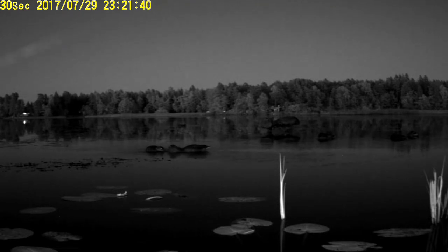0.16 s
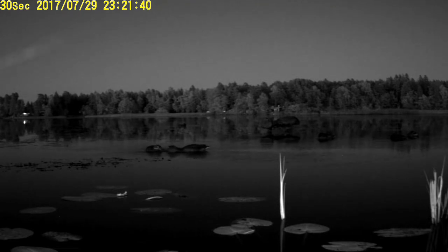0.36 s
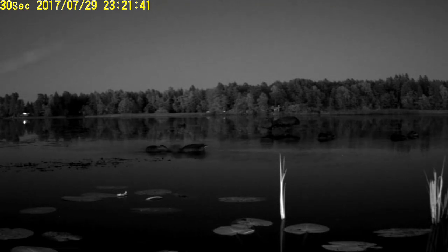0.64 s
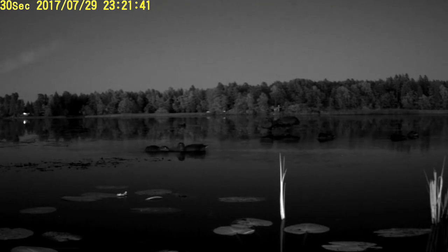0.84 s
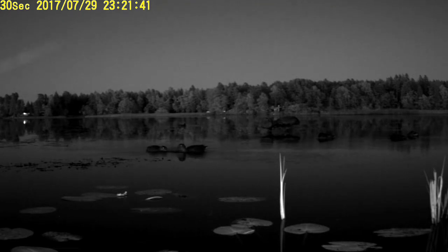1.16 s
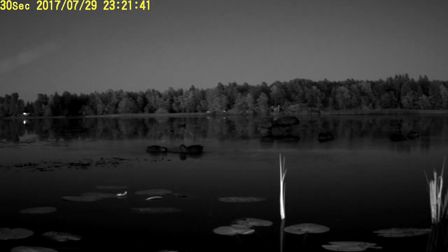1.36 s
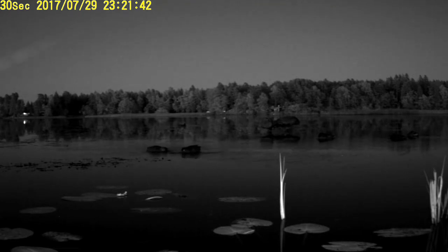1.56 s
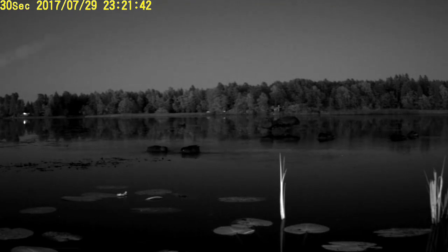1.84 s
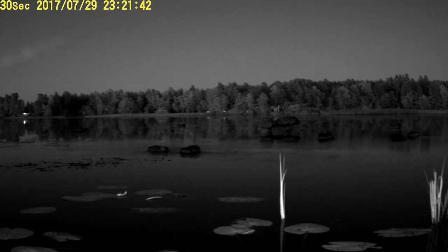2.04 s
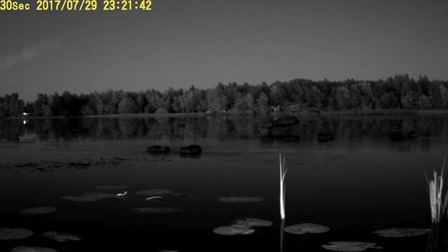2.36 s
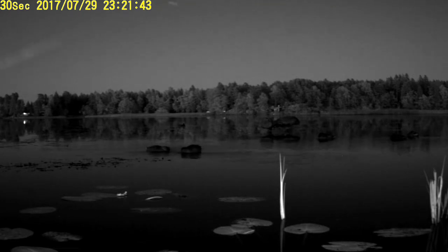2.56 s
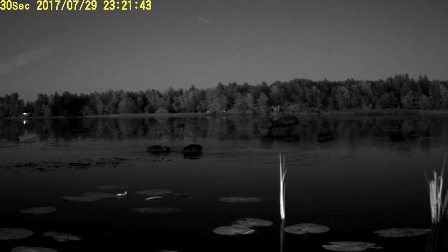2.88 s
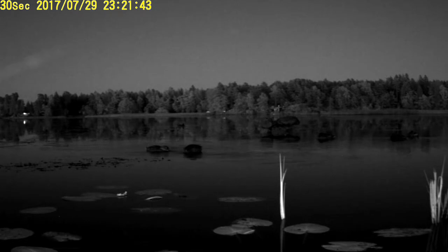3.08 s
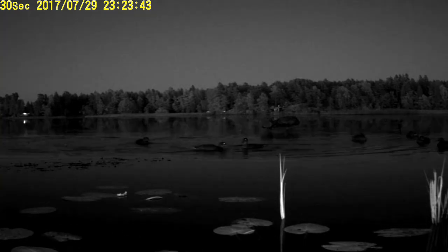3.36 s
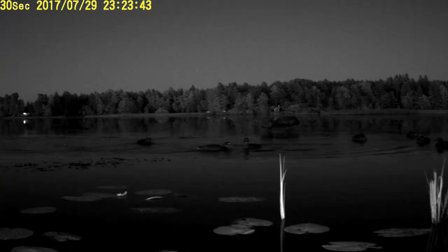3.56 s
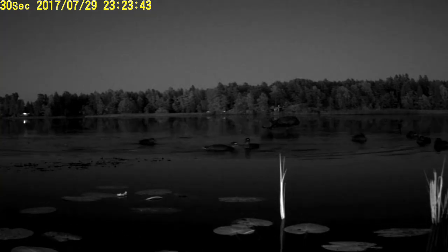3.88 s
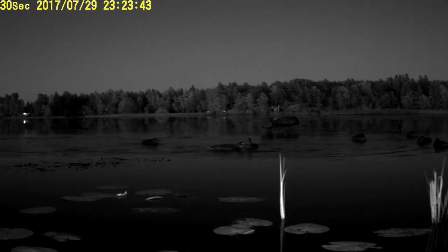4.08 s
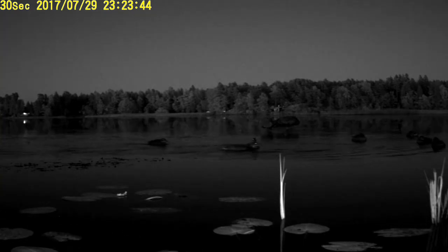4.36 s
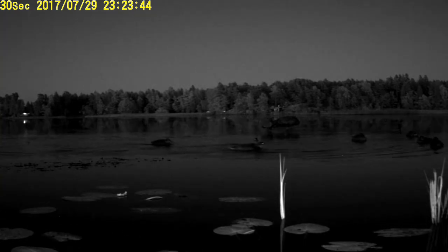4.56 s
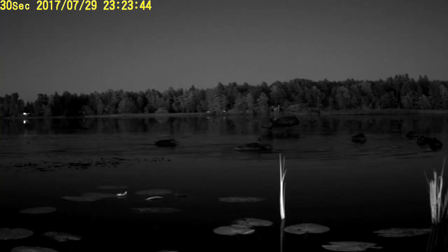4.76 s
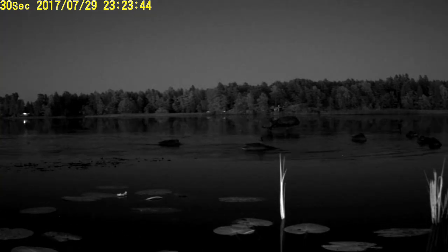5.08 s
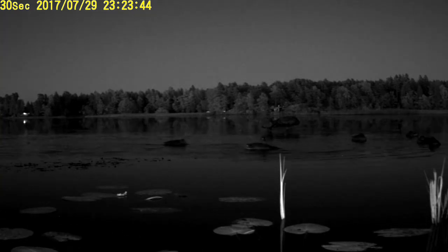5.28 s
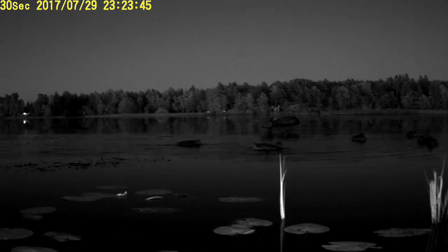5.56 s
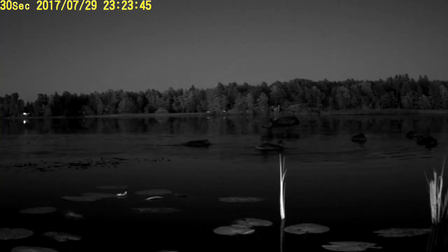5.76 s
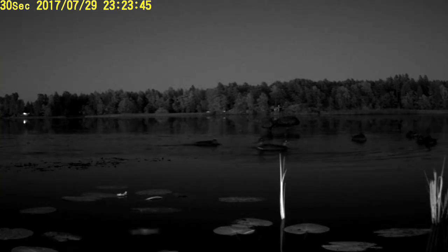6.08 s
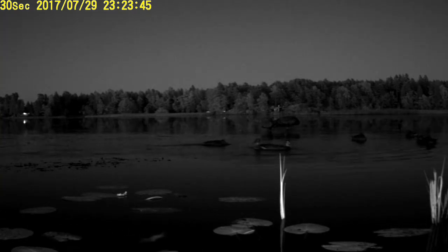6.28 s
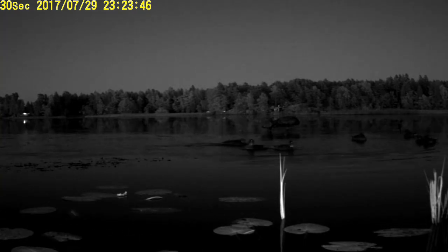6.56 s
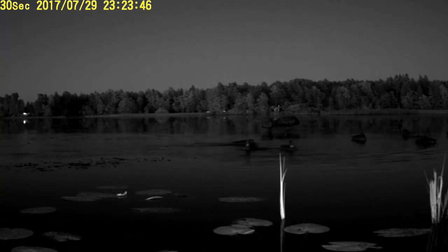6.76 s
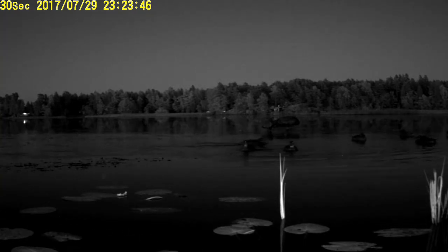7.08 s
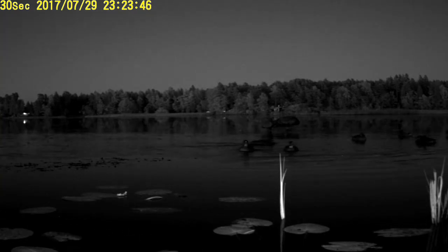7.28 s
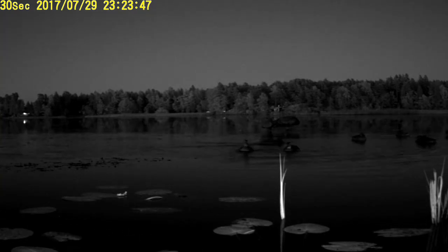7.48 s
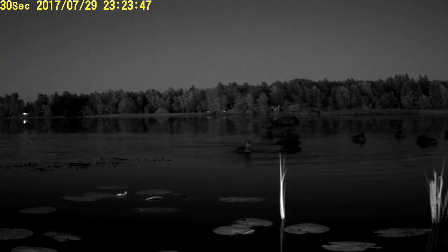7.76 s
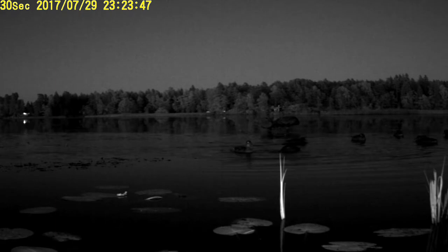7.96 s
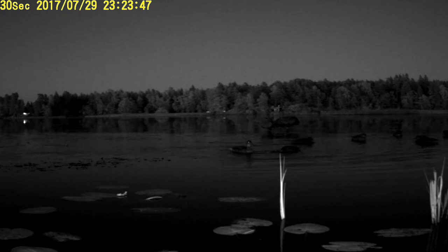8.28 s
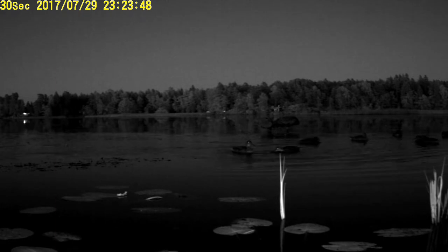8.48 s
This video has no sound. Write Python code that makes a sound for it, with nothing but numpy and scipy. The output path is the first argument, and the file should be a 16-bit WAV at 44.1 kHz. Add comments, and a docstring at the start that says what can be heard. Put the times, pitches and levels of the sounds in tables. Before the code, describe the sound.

Open water, outdoors, almost no echo. First a sparse, hushed stretch of hiss with tiny low peeps and faint short quacks far away. Then a sudden, very loud electrical thud drains off quickly. Afterwards the ducks are livelier: small wooden bill claps, scratchy sieving rasps and short arching whistles about twice a second, a wet slap or two, thinning to isolated ticks and peeps. A plain, noisy fixed microphone on the shore.

```python
"""Far ducks on a lake at night peep in gliding whistles, quack in nasal pulses, clap and rasp their bills.
The microphone is a trail camera's on the shore; water slaps now and then and a faint return rings from the shore.
Under it lie shaped noise hiss, slow drift and two thin sine whines of the electronics.
Midway the amplifier restarts: an offset jumps in and drains away, the volume falls and climbs in small steps.
"""
import sys
import numpy as np
from scipy import signal
from scipy.fft import rfft, irfft
from scipy.io import wavfile
from scipy.ndimage import uniform_filter1d

SR = 44100
rng = np.random.default_rng(int(sys.argv[2]) if len(sys.argv) > 2 else 0)


def materialize(psi):
    """Save the field psi as 16-bit PCM at rate SR to the path in sys.argv[1].

    A 1-D psi becomes a single channel; in a 2-D psi each row is a channel.
    """
    bounded = np.clip(np.atleast_2d(psi).T, -1, 1)
    quanta = np.round(bounded * 32767).astype(np.int16)
    wavfile.write(sys.argv[1], SR, quanta)


N = 380512
T = np.arange(N) / SR

# noise floor of microphone and amplifier, shape only: freq_hz, relative_db
HISS_SPECTRUM = [(15, -36), (25, -5), (116, -3.5), (178, -5.5), (349, -6), (722, -8.5), (804, -9),
                 (1020, -10), (1340, -11.5), (15500, -19.5)]
HISS_DB = -56
# steady whines of the electronics: freq_hz, level_db [rms]
WHINES = [(8857.8, -81), (15734.3, -77)]
# offset at the amplifier input, ahead of the volume: time_s, level_db
OFFSET_CURVE = [(3.378, 7), (3.39, 9.2), (3.402, 8), (3.41, 9.3), (3.43, 8), (3.463, 5.4), (3.502, .4),
                (3.522, .6), (3.547, -3.6), (3.565, -4.2), (3.613, -12), (3.645, -14), (3.681, -22.9),
                (3.762, -36.2), (4.3, -56), (8.7, -90)]
# faint broadband noise after the restart, with its own level curve: time_s, level_db [rms]
FAINT_NOISE_CURVE = [(3.378, -43), (3.435, -71), (3.48, -61), (3.69, -63), (3.75, -100)]
# slaps of water: start_s, length_s, spray_db [rms], note_hz [hollow note, at its start], note_db [rms]
WATER_SLAPS = [(0.371, 0.011, -57, 400, -63), (7.125, 0.026, -41, 401, -47),
               (7.396, 0.024, -73, 770, -54.5)]
# colour of the spray, shape only: freq_hz, relative_db
SPRAY_SPECTRUM = [(71, -32), (120, -9), (396, -8), (3500, -30), (4240, -39), (4670, -31), (9900, -38),
                  (12000, -33), (15600, -54), (22000, -120)]
# bills sieving water: start_s, length_s, loudest_at [share of length 0-1], level_db [rms at loudest], pitch_hz
BILL_RASPS = [ (3.646, 0.048, .3, -51, 1730), (3.7, 0.11, .3, -61, 2000), (3.9, 0.055, .5, -62, 1830),
              (4.1, 0.065, .95, -57, 1930), (4.166, .02, 0.2, -43.5, 1600), (4.18, .055, .4, -55, 2135),
              (4.39, .04, .4, -62, 1980), (4.6, .03, .1, -57, 1810), (4.813, 0.024, .75, -51, 1640),
              (4.837, 0.045, .35, -52, 1668), (5.137, .022, 0.65, -44, 1650),
              (5.619, 0.027, .85, -46, 1404), (5.66, .04, .4, -56, 1466), (5.72, .06, 0.2, -67, 1710),
              (5.88, .03, .3, -61, 1780), (5.957, 0.022, 0.5, -43, 1350), (6.12, 0.028, .6, -61, 1820),
              (6.387, .013, .05, -53, 1520), (6.404, 0.024, .75, -46.5, 1704),
              (6.596, .022, 0.9, -40, 1620), (6.877, 0.024, .85, -49, 1370), (6.992, .028, .95, -50, 1590),
              (7.024, .038, .2, -59, 1730), (7.085, .025, .6, -54, 1850), (7.307, 0.076, .4, -58, 1590),
              (7.387, 0.043, .4, -49, 1528), (7.55, .05, .3, -58, 1920), (8.545, .03, .7, -58, 1780), ]
# single bill claps: time_s, peak_db, pitch_hz [of the blow]
BILL_CLAPS = [(3.754, -37, 1310.0), (3.8042, -35.5, 1010), (3.8072, -43, 890.0), (3.9583, -35.5, 1120.0),
              (3.9835, -34.5, 1380.0), (4.1633, -34, 1150), (4.17, -31.5, 1390.0), (4.176, -41.8, 1310.0),
              (4.579, -33.5, 1560), (4.599, -36.5, 920.0), (4.816, -36.5, 1290.0), (4.8268, -40, 1660.0),
              (4.8664, -37, 1290.0), (4.8787, -41, 1420.0), (5.1181, -35.5, 1150.0), (5.1213, -40, 1090.0),
              (5.154, -30, 1260), (5.1594, -34, 1270), (5.3536, -37, 810.0), (5.5345, -35.5, 1480),
              (5.602, -36, 860.0), (5.642, -40, 1320), (5.6452, -27.5, 1340), (5.652, -34, 1190.0),
              (5.931, -36, 990.0), (5.9346, -39, 1430.0), (5.975, -32, 1310), (6.3857, -34.5, 1010.0),
              (6.4205, -35, 1360), (6.423, -29, 1010), (6.4276, -26, 1370), (6.582, -36, 880.0),
              (6.587, -38, 960), (6.5905, -35, 840), (6.599, -40, 1250), (6.608, -31, 840),
              (6.612, -26.5, 1440), (6.614, -26.5, 1140), (6.619, -23, 1500), (6.6249, -24, 1320),
              (6.862, -33.5, 1260), (6.9014, -32, 1160), (6.9066, -40, 1140.0), (6.9966, -44.0, 1450.0),
              (7.0017, -39, 1160), (7.0147, -32.5, 1380), (7.0192, -32, 1110.0), (7.4095, -36, 1180),
              (7.4127, -42, 1350.0), (7.513, -37.5, 1400.0), (7.7413, -40.5, 855), (7.964, -41, 1020.0),
              (8.2047, -40, 824), (8.436, -39, 960), (8.5557, -38, 1310.0)]
# ringing of the bill: freq_hz, relative_db [to the blow, for a blow at 1400 Hz], t60_s
BILL_MODES = [(1520, -27.5, 0.024), (2540, -32, 0.0073), (4460, -3.5, 0.00057)]
# quacks: start_s, length_s, pitch_hz, level_db, nasal_db [nasal against throat],
# weak [loss of every second pulse 0-1], jitter [0-1]
DUCK_QUACKS = [(1.239, 0.105, 348, -65, 2, 0.4, 0.03), (2.476, 0.11, 348, -64, 0.5, 0.55, 0.02),
               (3.298, 0.11, 342, -62.5, 1, 0.4, 0.07)]
# throat and nasal resonances: freq_hz, width_hz [of the narrower of two passes], relative_db
THROAT_RESONANCES = [(350, 200, 2), (700, 250, 1), (1050, 300, -2)]
NASAL_RESONANCES = [(1900, 300, 0), (2350, 450, -5)]
# gliding whistles: start_s, length_s, loudest_at [share of length 0-1],
# start_hz, half_hz [halfway], end_hz, level_db [at loudest], overtone_db [relative to the whistle]
WHISTLES = [ (.22, .04, .55, 690, 770, 760, -57, -15), (.432, .02, .7, 1765, 1800, 1830, -55, -25),
            (.44, 0.049, 0.45, 700, 900, 760, -55, -20), (.575, .025, .5, 2700, 2620, 2590, -62, -20),
            (0.668, .03, .35, 610, 655, 720, -61, -11), (0.899, .055, .5, 643, 800, 700, -58, -9),
            (1.115, 0.048, .55, 600, 780, 720, -56.5, -15), (3.64, 0.057, .3, 1164, 1160, 1100, -52, -14),
            (3.692, 0.046, 0.5, 2760, 2330, 1400, -55.5, -9), (3.899, .06, .65, 1014, 1100, 960, -58, -8),
            (3.999, .045, 0, 2000, 1700, 1600, -55, -20), (4.101, .06, 1, 1000, 1200, 1220, -54.5, -13),
            (4.177, .04, .7, 1310, 1580, 1800, -48, -11), (4.193, .055, 0.14, 2375, 2300, 1450, -49.5, -16),
            (4.366, 0.073, 0.64, 960, 1130, 1185, -57, -8), (4.59, 0.058, 0.6, 1065, 1220, 950, -55, -14),
            (4.64, .04, .3, 1570, 1520, 1460, -62, -15), (4.845, .026, .5, 2100, 1720, 1450, -54, -20),
            (4.871, .06, .3, 1074, 1040, 760, -58, -13), (5.05, 0.091, .75, 698, 1200, 1000, -55, -13),
            (5.434, 0.076, 0.7, 676, 1170, 915, -55.5, -17),
            (5.655, 0.059, 0, 1075, 1300, 1100, -53.5, -13), (5.72, 0.075, .5, 910, 850, 800, -60, -6),
            (5.715, 0.077, .4, 1180, 1220, 1280, -61.5, -20), (5.868, .05, 0.7, 825, 1080, 1095, -58, -12),
            (6.091, 0.063, 0.5, 680, 1200, 1000, -57, -11), (7.018, .07, 0.2, 1087, 1000, 460, -56, -9),
            (7.33, .055, 0.3, 855, 1100, 1300, -60, -12), (7.407, 0.043, .25, 1100, 2600, 2920, -58, -18),
            (7.54, 0.062, 0.64, 1030, 1240, 1100, -54, -9), (7.76, .03, .75, 1280, 1240, 1400, -58, -17),
            (7.8, 0.053, .45, 1045, 1100, 1170, -58, -5), (7.991, 0.068, 0.74, 605, 1100, 1145, -59, -7),
            (8.3, 0.055, .25, 720, 980, 965, -59.5, -10), (8.512, 0.076, 0.65, 612, 1140, 800, -58.5, -5), ]

RESTART_S = 3.37788
REST_OFFSET = .0036  # constant, full scale 1
TOP_HZ = 15800
STEP_DB, WRAP_S = .53, .0005
# the volume setting drops in steps that come ever slower
DROPS, FIRST_DROP_S, DROP_GAP_S, DROP_GAP_GROWTH = 8, 3.3806, .00195, 1.132
# then climbs back ever faster: step k comes at origin + scale * (k + lead) ** power
CLIMBS, CLIMB_ORIGIN_S, CLIMB_SCALE_S, CLIMB_LEAD, CLIMB_POWER = 33, 3.28568, .095806, 4.91, .39271
# how far below its loudest a call starts and ends
RASP_RISE_DB, RASP_FALL_DB = 13, 11
PEEP_RISE_DB, PEEP_FALL_DB = 8, 11.5
HOARSE = .3  # depth of a whistle's flutter in size and in phase (radians)


def undb(db):
    """dB to gain."""
    return 10 ** (np.asarray(db) / 20)


def level(x, db):
    """Scale to an rms level."""
    return x * undb(db) / np.sqrt(np.mean(x ** 2))


def band(x, hz, width):
    """Resonance, gain 1 at the centre."""
    return signal.lfilter(*signal.iirpeak(hz, hz / width, SR), x)


def double_band(x, hz, width):
    """Two resonances in a row, the second twice as wide, for steeper flanks."""
    return band(band(x, hz, width), hz, 2 * width)


def add(out, s, x):
    """Mix x in at s seconds."""
    i = int(s * SR)
    out[i:i + len(x)] += x[:N - i]


def coloured(spectrum):
    """Noise with a spectrum of (Hz, dB) points, joined along a logarithmic frequency axis."""
    hz = np.maximum(np.arange(N // 2 + 1) * SR / N, 1)
    at, db = np.transpose(spectrum)
    gain = undb(np.interp(np.log(hz), np.log(at), db))
    return irfft(rfft(rng.standard_normal(N)) * gain, N)


def call(length, loudest, rise_db, fall_db):
    """Progress 0-1 and gain of one short call: it swells to its loudest, fades, and has soft edges."""
    t = np.arange(0, length, 1 / SR)
    edge = np.clip(np.minimum(t, length - t) / .004, 0, 1)
    peak_at = np.clip(loudest, .01, .99)
    db = np.interp(t / length, [0, peak_at, 1], [-rise_db, 0, -fall_db])
    return t / length, edge * undb(db)


def hiss():
    """Microphone and amplifier noise, slow drift, and two thin whines of the electronics."""
    drift = level(band(rng.standard_normal(N), 9.1, 20.6), -56.5)
    whine = sum(np.sqrt(2) * undb(db) * np.sin(2 * np.pi * hz * T) for hz, db in WHINES)
    return level(coloured(HISS_SPECTRUM), HISS_DB) + drift + whine


def volume():
    """Stepped volume in dB; on every third step the fine setting wraps just before the coarse one moves."""
    drop_gaps = (DROP_GAP_GROWTH ** np.arange(DROPS) - 1) / (DROP_GAP_GROWTH - 1)
    down = FIRST_DROP_S + DROP_GAP_S * drop_gaps
    up = CLIMB_ORIGIN_S + CLIMB_SCALE_S * (np.arange(CLIMBS) + CLIMB_LEAD) ** CLIMB_POWER
    # the restart itself jumps part of the way down; the last climb ends at 0 dB
    steps = np.searchsorted(up, T) - np.searchsorted(down, T) + DROPS - CLIMBS
    for moments, sign in ((down[1::3], 2), (up[2::3], -2)):
        for s in moments:
            steps = steps + sign * ((T >= s - WRAP_S) & (T < s))
    return STEP_DB * steps * (T >= RESTART_S)


def splashes():
    """Short slaps of water: spray over the sinking note of the cavity."""
    out = np.zeros(N)
    water = coloured(SPRAY_SPECTRUM)
    for s, length, spray_db, hz, note_db in WATER_SLAPS:
        t = np.arange(0, length, 1 / SR)
        i = int(s * SR)
        swell = np.sin(np.pi * t / length)
        spray = water[i:i + len(t)] * swell ** 0.7
        note = np.sin(2 * np.pi * hz * t * (1 - 0.17 * t / length)) * swell
        add(out, s, level(spray, spray_db) + level(note, note_db))
    return out


def rasps():
    """Dense tiny claps of scattered size and phase, each ringing for a moment at the mouth's pitch."""
    chance = rng.random((3, N))
    struck = chance[0] < 2500 / SR  # 2500 claps a second on average
    size = undb(-2.5 * np.log(1 - chance[1]))
    grains = struck * size * np.exp(2j * np.pi * chance[2])
    fade = undb(-60 / (.0035 * SR))  # per sample, used twice for a rounded onset
    rings = signal.lfilter([1], np.poly([fade, fade]), grains)
    rings = rings / np.sqrt(np.mean(rings.real ** 2))
    out = np.zeros(N)
    for s, length, loudest, db, hz in BILL_RASPS:
        u, swell = call(length, loudest, RASP_RISE_DB, RASP_FALL_DB)
        i = int(s * SR)
        # the complex rings are shifted up to the pitch
        pitched = (rings[i:i + len(u)] * np.exp(2j * np.pi * hz * u * length)).real
        add(out, s, undb(db) * swell * pitched)
    return out


def clap(hz):
    """One swing of air at the blow's pitch, then the bill rings; sharper blows ring it more."""
    t = np.arange(-60, 500) / SR
    blow = -np.cos(2 * np.pi * hz * t + .8) * np.exp(-(t * hz / .4) ** 2)
    ring = sum(undb(d) * np.sin(2 * np.pi * f * t) * undb(-60 * t / t60) for f, d, t60 in BILL_MODES)
    both = blow + (t > 0) * ring * (hz / 1400) ** 0.86
    return both / np.abs(both).max()


def ticks():
    """Single bill claps, each a blow with its ring scaled to a peak level."""
    out = np.zeros(N)
    for s, db, hz in BILL_CLAPS:
        add(out, s - 48 / SR, undb(db) * clap(hz))  # early, as the blow builds up before its centre
    return out


def quacks():
    """Strong-weak pulses through throat and nasal resonances."""
    out = np.zeros(N)
    for s, length, hz, db, nasal_db, weak, jitter in DUCK_QUACKS:
        chance = rng.standard_normal((64, 2))
        at = np.cumsum((1 + jitter * chance[:, 0]) / hz)
        size = undb(1.5 * chance[:, 1]) * (1 - weak * (np.arange(64) % 2))
        # swells in, stops short
        size = size * np.sin(np.pi * np.clip(at / length, 0, 1) ** 1.7) ** .8
        pulses = np.zeros(SR // 4)
        pulses[np.clip(at * SR, 0, SR // 4 - 1).astype(int)] = -size
        throat = sum(undb(d) * double_band(pulses, f, w) for f, w, d in THROAT_RESONANCES)
        # a puff of air follows each pulse and blurs the upper resonances
        puff_size = np.convolve(pulses, undb(-np.arange(120) / 3))[:len(pulses)]
        puffs = puff_size * rng.standard_normal(len(pulses))
        breathy = pulses + 0.33 * puffs
        lower, upper = (undb(d) * double_band(breathy, f, w) for f, w, d in NASAL_RESONANCES)
        nasal = lower - upper  # neighbours swing opposite
        voice = throat + undb(nasal_db) * nasal
        # the level holds over the quack's length, not over the quarter-second buffer
        add(out, s, level(voice, db) * np.sqrt(.25 / length))
    return out


def peeps():
    """Gliding whistles, hoarse, the overtone more so; the pitch draws an arch."""
    out = np.zeros(N)
    for s, length, loudest, start_hz, half_hz, end_hz, db, overtone_db in WHISTLES:
        u, swell = call(length, loudest, PEEP_RISE_DB, PEEP_FALL_DB)
        arch = (2 * half_hz - start_hz - end_hz) * 2 * u * (1 - u)
        hz = start_hz + (end_hz - start_hz) * u + arch
        noise = rng.standard_normal((3, SR // 10))
        flutter = [level(uniform_filter1d(row, size=70), 0)[:len(u)] for row in noise]
        phase = 2 * np.pi * np.cumsum(hz) / SR + HOARSE * flutter[1]
        tone = (1 + HOARSE * flutter[0]) * np.sin(phase)
        overtone = undb(overtone_db) * (1 + 2 * HOARSE * flutter[2]) * np.sin(2 * phase)
        add(out, s, np.sqrt(2) * undb(db) * swell * (tone + overtone))
    return out


def scene():
    """Ducks across open water, with a faint return from the shore, over the hiss."""
    ducks = peeps() + quacks() + ticks() + rasps() + splashes()
    tail_s = T[:SR // 10]
    shore = undb(-39.5) * rng.standard_normal(SR // 10) * undb(-60 * tail_s / 0.095)
    return (ducks + signal.fftconvolve(ducks, shore)[:N] + hiss())[None]


def record(dry):
    """At the restart an offset jumps in ahead of the stepped volume, and faint noise is laid over the result;
    the top is cut."""
    on = np.clip((T - RESTART_S) * SR, 0, 1)
    offset = undb(uniform_filter1d(np.interp(T, *np.transpose(OFFSET_CURVE)), size=200))
    faint_noise = undb(np.interp(T, *np.transpose(FAINT_NOISE_CURVE))) * rng.standard_normal(N)
    # low noise around 300 Hz roughens the offset after the jump and fades
    low_noise = band(band(rng.standard_normal(N), 300, 250), 300, 400)
    roughness = level(low_noise, -33) * undb(-60 * np.abs(T - RESTART_S) / .2)
    amplified = (dry + on * offset * (1 + roughness)) * undb(volume())
    out = amplified + on * faint_noise + REST_OFFSET
    top_cut = signal.ellip(8, .1, 40, TOP_HZ, fs=SR, output="sos")
    return signal.sosfiltfilt(top_cut, out)


dry = scene()
out = record(dry)
materialize(out)
```